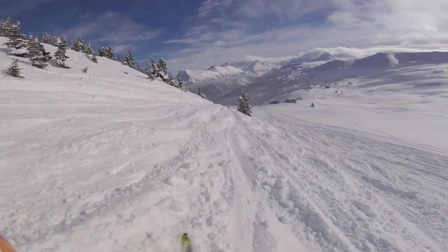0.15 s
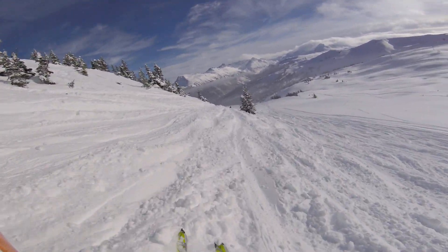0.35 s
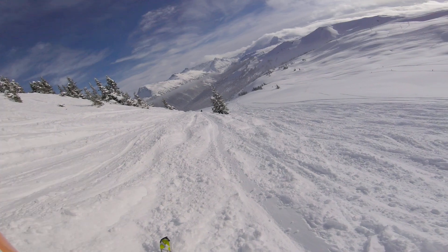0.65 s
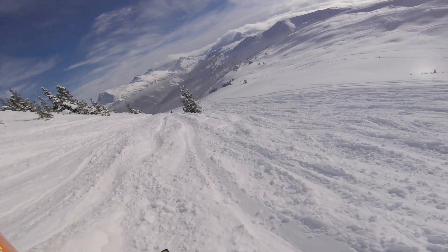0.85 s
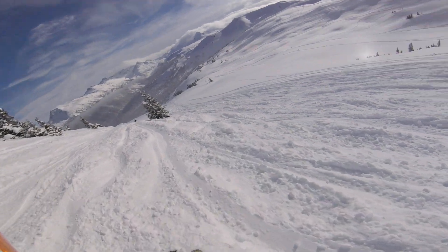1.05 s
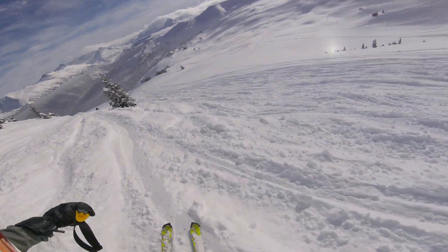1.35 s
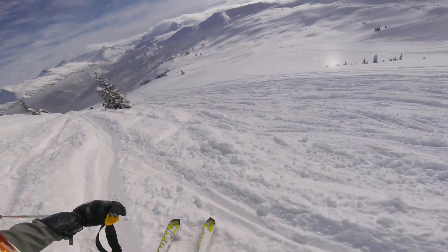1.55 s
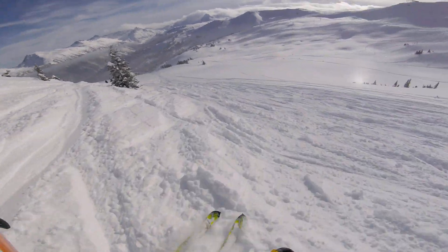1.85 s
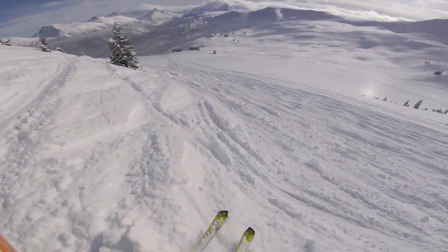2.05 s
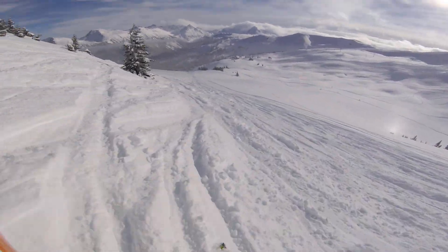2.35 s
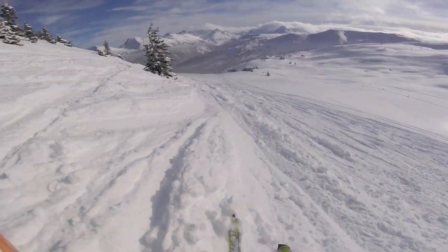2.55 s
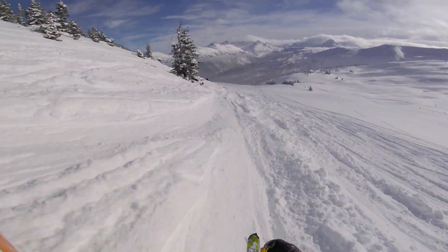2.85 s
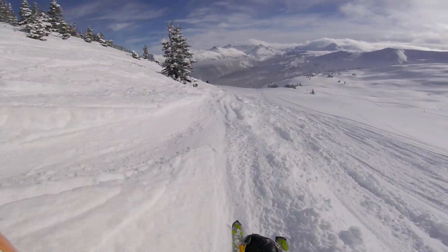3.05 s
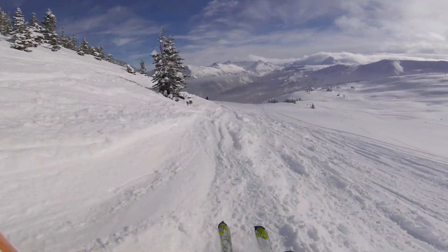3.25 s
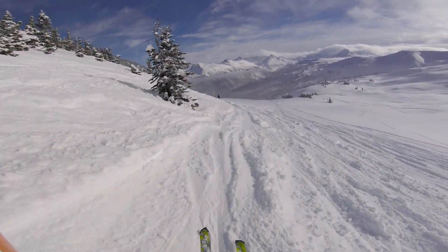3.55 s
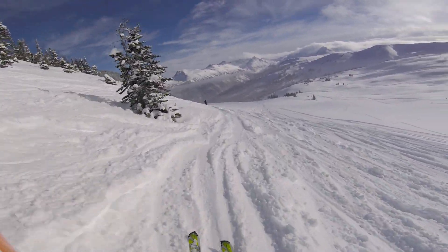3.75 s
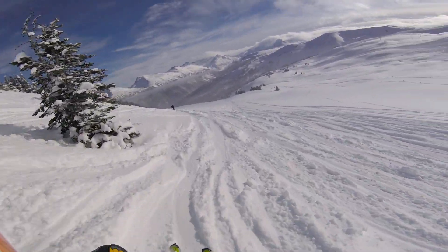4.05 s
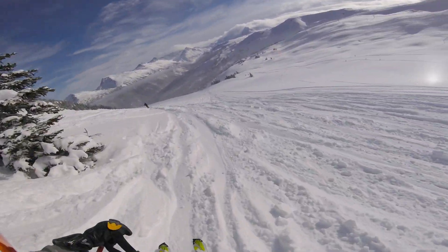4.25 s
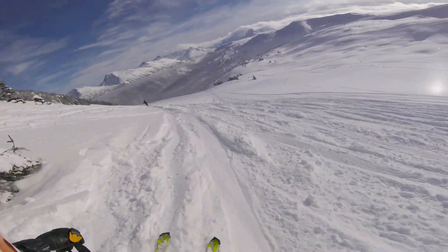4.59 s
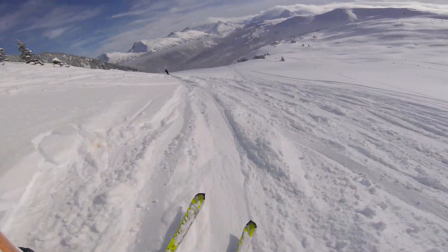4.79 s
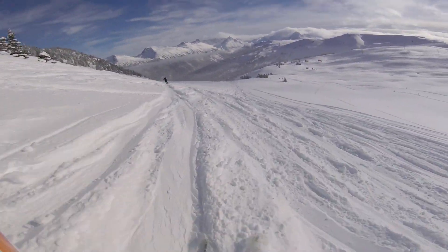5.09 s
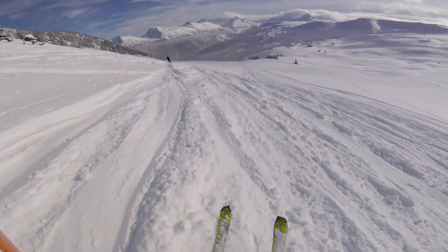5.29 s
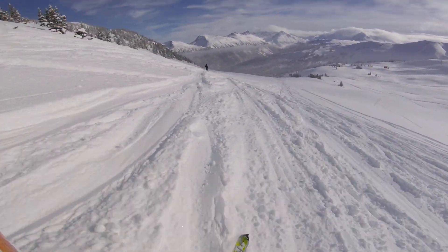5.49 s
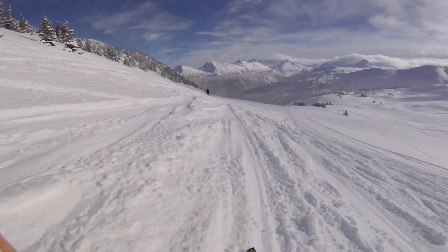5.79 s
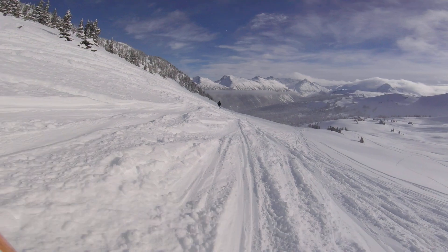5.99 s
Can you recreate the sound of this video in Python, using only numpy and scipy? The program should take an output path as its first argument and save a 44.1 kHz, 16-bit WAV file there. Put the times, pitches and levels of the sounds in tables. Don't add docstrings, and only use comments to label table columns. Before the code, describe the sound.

Wind dominates: a low, fluttering roar pressing on a small enclosed microphone, quiet at first, then rising in irregular gusts and dull thuds with brief lulls. Beneath it skis hiss brightly through chopped powder, in short swishes and longer scrapes. Buckles, poles and ice crumbs tick lightly, and boots squeak very faintly. Outdoors, wide open and dry, ending in the heaviest buffeting with a few knocks.

```python
import sys
import numpy as np
from scipy import signal
from scipy.fft import rfft, irfft
from scipy.io import wavfile
from scipy.ndimage import uniform_filter1d

SR = 44100
rng = np.random.default_rng(int(sys.argv[2]) if len(sys.argv) > 2 else 0)


def put_to_file(sound):
    columns = np.atleast_2d(sound).T
    safe = np.clip(columns, -1, 1)
    whole_steps = np.round(safe * 32767)
    wavfile.write(sys.argv[1], SR, whole_steps.astype(np.int16))


def boost_factor(decibels):
    exponent = np.asarray(decibels, float) / 20
    return 10 ** exponent


N = 270333

# pitch_hz, level_db
CIRCUIT_WHINE = [(877.5, -73.5)]
SELF_NOISE_DB = -70

THIN_FROM_HZ, THIN_DB, THIN_SPREAD_DB = 10200, 0.5, 4.5
TOP_HZ = 13500

# start_s, peak_db, bright_db, dull_db
TICKS = [(0.0327, -37.5, -50, -63), (0.5711, -41, -41, -49), (1.1394, -55, -45, -48),
         (1.2614, -55, -50, -60), (1.6548, -39, -40, -56), (1.8984, -42, -48, -50), (2.006, -50, -47, -49),
         (2.1355, -38, -52, -41), (2.147, -35.5, -54, -55), (2.3476, -38.5, -55, -43),
         (3.4266, -54, -55, -39), (3.463, -30, -41, -51), (4.5471, -48, -55, -51),
         (4.7411, -32, -42, -30.5), (5.0306, -49, -45, -57), (5.8521, -32.5, -58, -56),
         (5.9695, -35, -55, -36), (5.9884, -42, -47, -42), (6.0147, -29, -58, -25), (6.0611, -42, -53, -30),
         (6.0826, -44, -58, -49)]

# start_s, length_s, first_pitch_hz, last_pitch_hz, level_db
SQUEAKS = [(3.328, 0.021, 1680, 1760, -50.5), (3.353, 0.03, 1725, 1720, -52), (4.336, 0.038, 800, 870, -52),
           (4.371, 0.035, 799, 1010, -47.5), (4.337, .034, 1400, 1370, -57.5),
           (4.403, 0.065, 1476, 1375, -57), (4.476, 0.038, 1333, 1460, -62),
           (4.553, 0.037, 1133, 1230, -52), (4.59, 0.02, 990, 830, -57), (4.599, 0.01, 1393, 1740, -52),
           (4.652, 0.043, 2600, 2800, -65), (5.036, .016, 1650, 1850, -56), (5.23, 0.02, 1516, 1830, -52),
           (5.249, 0.034, 1830, 1930, -53.5), (5.823, 0.011, 1570, 1490, -49.5)]
# pitch_hz, octave_db, roughness (0 to 1)
SQUEAK_VOICE = [(850, -28, 0.38), (1180, -30, 0.13), (1400, -12.5, 0.5), (1700, -12, 0.2), (2700, -28, .7)]

# pitch_hz, gain_db
PORT_RINGING = [(1800, -38), (3000, -30.5), (4140, -20), (4800, -9), (5300, -3), (5600, -2), (6050, -7.5),
                (6450, 4), (6750, -1), (7330, -6.5), (9600, -13.5), (10800, -30.5), (13000, -32),
                (14400, -55)]
# time_s, level_db
GLIDE = [
    (0, -58),
    (1.2, -58),
    (1.95, -57),
    (2.25, -61),
    (3.5, -59),
    (4.0, -62),
    (5.0, -58.5),
    (5.9, -58.5),
    (6.13, -56.5),
]
# start_s, hold_s, level_db
CLUMPS = [(0.0, 0.011, -54.5), (0.472, .05, -65), (0.566, .012, -56), (0.63, 0.027, -59),
          (1.264, 0.016, -55), (1.66, .006, -61), (1.71, .03, -59), (1.755, .04, -54), (1.885, 0.022, -58),
          (2.414, 0.31, -50.5), (2.803, 0.14, -47), (2.834, .04, -47), (3.006, .045, -49.5),
          (3.067, 0.061, -51.5), (3.2, 0.16, -52.5), (3.263, 0.052, -53), (3.455, .02, -57),
          (3.672, 0.15, -56), (4.015, .2, -60.5), (4.598, 0.088, -51), (4.728, 0.025, -52.5),
          (5.107, 0.011, -49.5), (5.122, 0.11, -52), (5.265, .035, -49.5), (5.33, 0.12, -53),
          (5.515, 0.024, -50), (5.577, 0.14, -51.5), (5.674, 0.041, -54.5), (5.81, 0.017, -54.5)]
CLUMP_ATTACK_S, CLUMP_FALL_S, FALL_PER_HOLD = 0.022, 0.015, 0.2
LONG_HOLD_S, ATTACK_PER_HOLD = 0.15, 0.5

# pitch_hz, level_db (per Hz)
EDDY_SPECTRUM = [(10, -13.5), (25, -3), (40, -2.2), (62, -0.87), (100, -6), (128, -3.5), (160, -9.5),
                 (250, -15.5), (400, -24), (630, -31.5), (1000, -37), (1600, -45.5), (2600, -54),
                 (5000, -76.5)]
EDDY_SIZES_HZ = (48, 135, 330, 900)
# rate_per_s, depth_db
FLUTTER = [(45, 1.15), (60, 3.5), (90, 2.5), (160, 1)]
# time_s, head_wind_db, shear_db (fine shear off the housing edge)
AIRFLOW = [(0.0, -16, -10), (0.4, -10.5, -9.5), (0.8, -5.5, -9.5), (1.15, -0.5, -8.5), (1.55, 1.3, -7),
           (1.95, 4, 0), (2.25, 0.5, 1), (2.5, 3, 12), (2.75, 5.5, 5), (2.95, 0.2, 1.2), (3.3, 7, 1),
           (3.75, -3.5, 0.4), (4.15, 0.2, 1), (4.55, 0.5, 2), (4.95, 0, 1.9), (5.3, 1.2, 4.5),
           (5.75, 11.5, 3.3), (6.13, 3.5, 13.5)]
FOLLOWS = [
    (0.78, -0.07),
    (0.97, 0.17),
    (0.51, 0.7853),
    (-0.07, 1.0742),
]
# middle_s, length_s, level_db, eddy_hz
GUSTS = [(1.39, 0.045, 11.5, 244), (2.16, 0.3, 4, 45), (2.776, 0.063, 9.5, 94), (3.031, 0.2, 6, 192),
         (3.349, 0.086, 9.5, 512), (3.617, 0.13, 16.5, 94), (3.627, 0.12, 6.5, 45),
         (3.622, 0.18, 10.5, 390), (3.892, 0.12, 6, 194), (4.368, 0.13, 1, 830), (4.383, 0.1, 8.5, 74),
         (4.494, 0.11, 8, 74), (4.59, 0.06, 4, 402), (4.71, 0.1, 7.5, 45), (5.07, 0.23, 6, 45),
         (5.128, 0.24, 6.5, 512), (5.682, 0.14, 8, 832), (5.755, 0.088, 6.5, 194)]
# middle_s, length_s, level_db, eddy_hz
LULLS = [(0.28, 0.12, -8, 45), (0.62, 0.15, -2, 45), (0.67, 0.34, -5.5, 245), (0.79, 0.087, -4, 45),
         (0.81, 0.26, -4.5, 315), (0.92, 0.19, -8.5, 247), (0.92, 0.071, -11, 45), (1.2, 0.1, -14, 94),
         (1.2, 0.17, -5, 315), (1.29, 0.44, -4, 45), (1.31, 0.1, -7, 315), (1.43, 0.06, -7, 60),
         (1.68, 0.15, -8.5, 93), (1.87, 0.056, -8.5, 193), (1.99, 0.11, -9.2, 198), (2.87, 0.23, -5, 250),
         (3.17, 0.13, -11.5, 192), (3.46, 0.07, -8, 130), (3.49, 0.22, -4, 404), (3.51, 0.32, -10.5, 93),
         (3.98, 0.13, -11, 45), (4.16, 0.079, -16, 74), (4.24, 0.25, -5.0, 313), (4.91, 0.22, -7, 195),
         (5.43, 0.16, -4.5, 195), (5.48, 0.37, -5, 512), (5.54, 0.31, -6, 74), (5.59, 0.23, -3.5, 247),
         (5.62, 0.07, -8, 70), (5.87, 0.05, -6, 130)]
# middle_s, level_db, eddy_hz
PUFFS = [(0.19, 6.5, 512), (0.249, 5.5, 402), (0.459, 5.5, 247), (0.504, 6.5, 45), (0.76, 3, 1100),
         (0.863, 7.5, 74), (1.023, 7.5, 45), (1.127, 9.8, 74.5), (1.28, 5, 1100), (1.302, 8, 119),
         (1.477, 6.7, 152), (1.515, 7, 330), (1.611, 8.5, 74), (1.941, 7.2, 45), (2.075, 5, 119),
         (2.15, 5, 50), (2.68, 4, 700), (2.734, 4.5, 402), (2.789, 6.5, 94), (3.053, 7, 58),
         (3.293, 6.9, 58), (3.395, 7, 80), (4.066, 5, 45), (4.116, 7.5, 119), (4.839, 6.5, 193),
         (5.153, 6.4, 45), (5.665, 2, 60), (5.737, 5.1, 119), (5.822, 5, 45), (5.971, 6.5, 45)]
PUFF_S = 0.081
REACH_OCTAVES = 1.15
WIND_DB = -25
# start_s, peak_db, pitch_hz
BUFFETS = [(0.96, -43, 72.7), (1.08, -22, 80), (1.251, -16, 73), (1.338, -17, 115), (1.384, -8.5, 80),
           (1.628, -14, 72.7), (1.688, -23, 130), (1.894, -23, 76), (2.557, -7, 98), (2.766, -10.5, 102),
           (3.049, -22, 133), (3.079, -18, 103), (3.255, -10.5, 101), (3.382, -7.5, 106), (3.594, -32, 129),
           (3.609, -10.5, 92), (3.624, -22, 73), (4.46, -9.5, 81.5), (5.158, -10, 80.6),
           (5.343, -9.5, 86.1), (5.48, -10, 94.2), (5.653, -7, 93.5), (5.726, -3, 102), (5.746, -19, 144),
           (5.81, -8, 73.4), (5.847, -17, 104), (5.895, -2, 158), (5.953, -8.5, 118), (6.049, -12, 110),
           (6.11, -10, 143)]


def level(x, db):
    return x * boost_factor(db) / np.sqrt(np.mean(x ** 2))


def band(x, lo_hz, hi_hz, order=2):
    return signal.sosfilt(signal.butter(order, [lo_hz, hi_hz], "bandpass", fs=SR, output="sos"), x)


def colour(x, points):
    hz, db = np.transpose(points)
    grid = np.maximum(np.fft.rfftfreq(2048, 1 / SR), 1)
    log_gain = np.interp(np.log(grid), np.log(hz), db) * np.log(10) / 20
    ceps = irfft(log_gain)
    ceps[1:1024] *= 2
    ceps[1025:] = 0
    ringing = irfft(np.exp(rfft(ceps)))
    return signal.fftconvolve(x, ringing)[:N]


def walk(rate):
    k = int(SR / rate)
    steps = np.repeat(rng.standard_normal(N // k + 1), k)
    return 1.3 * uniform_filter1d(uniform_filter1d(steps, k), k)[:N]


def even(x, span_s):
    k = int(span_s * SR)
    power = uniform_filter1d(uniform_filter1d(x ** 2, k), k)
    return x / np.sqrt(power + 1e-12)


def add(track, s, sound):
    i = int(s * SR)
    track[i:i + len(sound)] += sound[:N - i]


def columns(table):
    s, *values = np.transpose(table)
    return [np.interp(np.arange(N) / SR, s, v) for v in values]


def microphone_noise():
    noise = level(band(rng.standard_normal(N), 5500, 16000), SELF_NOISE_DB)
    for hz, db in CIRCUIT_WHINE:
        noise = noise + boost_factor(db) * np.sqrt(2) * np.sin(2 * np.pi * hz * np.arange(N) / SR)
    return noise


def ticks():
    mid, bright, dull = np.zeros((3, N))
    fade = np.exp(-np.arange(300) / SR / 0.00093)
    crackles = rng.standard_normal((len(TICKS), 300))
    for (s, db, bright_db, dull_db), crackle in zip(TICKS, crackles):
        add(mid, s + 0.000847, np.array([boost_factor(db)]))
        add(dull, s + 0.00092, np.array([boost_factor(dull_db)]))
        add(bright, s + 0.0006, boost_factor(bright_db) * np.sign(crackle) * fade)
    knock = boost_factor(17.0) * band(mid, 750, 2800, order=4)
    thud = boost_factor(28.5) * band(dull, 290, 1200, order=3)
    return knock + thud + boost_factor(11.5) * colour(bright, PORT_RINGING)


def squeaks():
    out = np.zeros(N)
    voice_hz, octaves_db, roughness = np.transpose(SQUEAK_VOICE)
    for s, length, first_hz, last_hz, db in SQUEAKS:
        middle_hz = (first_hz + last_hz) / 2
        octave_db = np.interp(middle_hz, voice_hz, octaves_db)
        rough = np.interp(middle_hz, voice_hz, roughness)
        u = np.linspace(0, 1, int(length * SR))
        slip = uniform_filter1d(rng.standard_normal(4000), size=90)[:len(u)] * 9
        pitch_hz = first_hz + (last_hz - first_hz) * u
        phase = 2 * np.pi * np.cumsum(pitch_hz) / SR + rough * slip
        swell = np.clip(7 * np.minimum(u, 1 - u), 0, 1) * (1 + rough * slip[::-1])
        tone = np.sin(phase) + boost_factor(octave_db) * np.sin(2 * phase)
        add(out, s, boost_factor(db + 4.5) * swell * tone)
    return out


def snow_db():
    t = np.arange(N) / SR
    power = boost_factor(*columns(GLIDE)) ** 2
    for s, hold, db in CLUMPS:
        attack_s = CLUMP_ATTACK_S + ATTACK_PER_HOLD * np.maximum(hold - LONG_HOLD_S, 0)
        fall_s = CLUMP_FALL_S + FALL_PER_HOLD * hold
        rise = np.clip((t - s) / attack_s + 1, 0, 1)
        fall = np.exp(-np.maximum(t - s - hold, 0) / fall_s)
        power = power + boost_factor(db) ** 2 * rise ** 2 * fall
    return 10 * np.log10(power)


def spray(spray_db):
    hits = rng.random(N) < 0.12
    crystals = hits * rng.standard_normal(N) * boost_factor(3.0 * rng.exponential(size=N))
    flicker_db = 0.46 * walk(30) + 0.81 * walk(110)
    stream = (level(crystals, -7.5) + rng.standard_normal(N)) * boost_factor(spray_db + flicker_db)
    port_gain = np.std(colour(rng.standard_normal(N), PORT_RINGING))
    ringing = colour(stream, PORT_RINGING) / port_gain * boost_factor(-1.76)
    scrape = level(band(rng.standard_normal(N), 950, 3310), -8.0)
    return ringing + scrape * boost_factor(spray_db + 0.5 * walk(24.27))


def eddy_strengths():
    strength_db = np.array(FOLLOWS) @ np.array(columns(AIRFLOW))
    puffs = [(s, PUFF_S, db, hz) for s, db, hz in PUFFS]
    for middle_s, length, db, hz in GUSTS + LULLS + puffs:
        swell = db * np.hanning(int(length * SR))
        for row, size_hz in zip(strength_db, EDDY_SIZES_HZ):
            octaves_away = np.log2(size_hz / hz)
            add(row, middle_s - length / 2, swell * np.exp(-(octaves_away / REACH_OCTAVES) ** 2))
    return strength_db


def wind(strength_db):
    octave = np.log2(np.maximum(np.fft.rfftfreq(N, 1 / SR), 1))
    hz, db = np.transpose(EDDY_SPECTRUM)
    stream = rfft(rng.standard_normal(N)) * boost_factor(np.interp(octave, np.log2(hz), db))
    shared, out = walk(45), 0
    for row, swell_db, (rate, depth_db) in zip(np.eye(4), strength_db, FLUTTER):
        share = np.sin(np.pi / 2 * np.interp(octave, np.log2(EDDY_SIZES_HZ), row)) ** 2
        eddies = irfft(stream * share, N)
        swell = boost_factor(swell_db + depth_db * walk(rate) + 1.24 * shared)
        out = out + np.std(eddies) * even(eddies, 0.037) * level(swell, 0)
    return level(out, WIND_DB)


def buffets():
    out = np.zeros(N)
    signs = rng.choice([-1, 1], len(BUFFETS))
    for (s, db, hz), sign in zip(BUFFETS, signs):
        cycles = np.arange(int(2 * SR / hz)) * hz / SR
        swell = np.sin(np.pi * (cycles / 2) ** 0.89) ** 2
        add(out, s, sign * boost_factor(db - 7.0) * swell * np.sin(2 * np.pi * cycles))
    return out


def scene():
    gear = ticks() + squeaks()
    snow = spray(snow_db())
    air = wind(eddy_strengths()) + buffets()
    return (gear + snow + air)[None]


def patchy_treble(x):
    hz, _, z = signal.stft(x, SR, nperseg=2048)
    usual = np.median(np.abs(z[0, (hz > 11000) & (hz < 13000)]))
    patches = np.kron(rng.standard_normal((129, z.shape[-1] // 3 + 1)), np.ones((8, 3)))
    threshold_db = THIN_DB + THIN_SPREAD_DB * patches[:len(hz), :z.shape[-1]]
    faint = np.abs(z) < usual * boost_factor(threshold_db)
    z = np.where((hz > THIN_FROM_HZ)[:, None] & faint, 0, z)
    return signal.istft(z, SR, nperseg=2048)[1][:, :N]


def roll_off(x):
    return signal.sosfilt(signal.butter(12, 14560, fs=SR, output="sos"), x)


def record(dry):
    end_fade = np.clip(np.arange(N, 0, -1) / 250, 0, 1)
    heard = (dry + microphone_noise()) * end_fade
    limited = signal.sosfilt(signal.butter(8, TOP_HZ, fs=SR, output="sos"), heard)
    mix = patchy_treble(limited)
    return roll_off(mix)


dry = scene()
out = record(dry)
put_to_file(out)
```